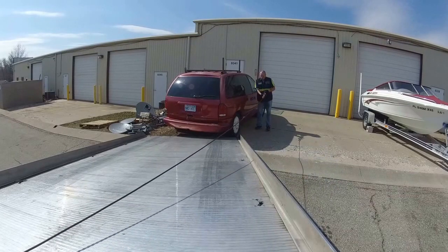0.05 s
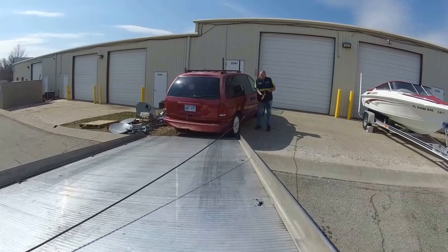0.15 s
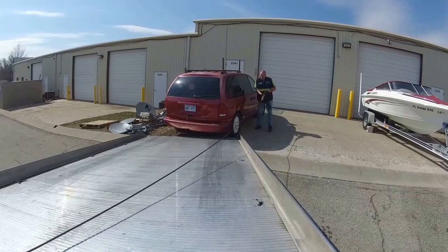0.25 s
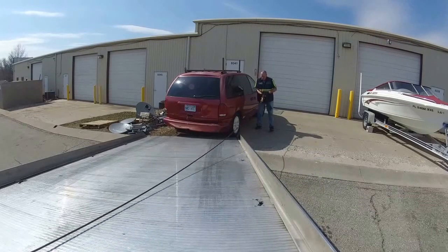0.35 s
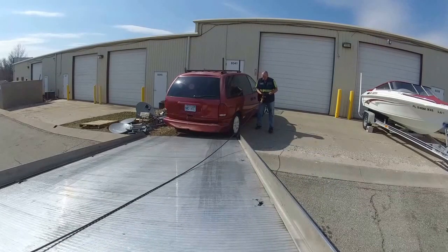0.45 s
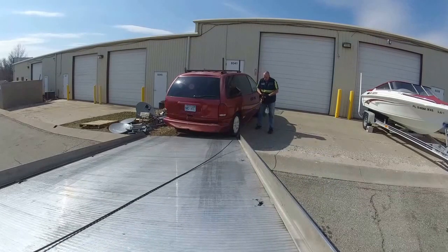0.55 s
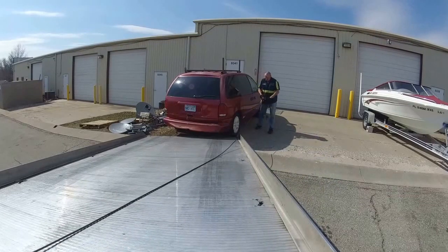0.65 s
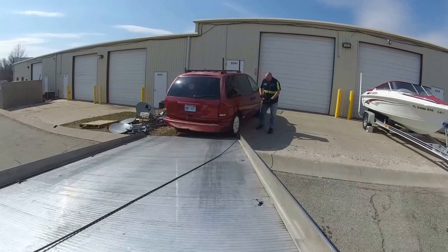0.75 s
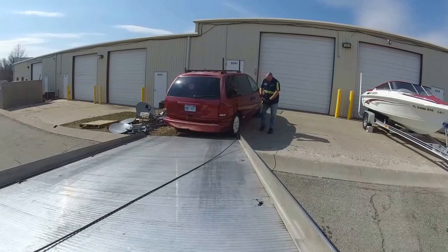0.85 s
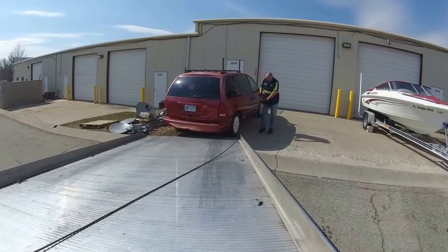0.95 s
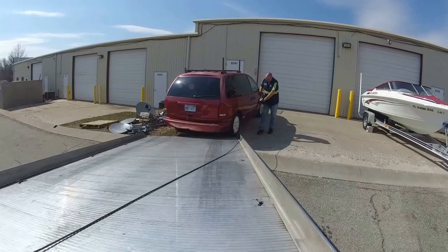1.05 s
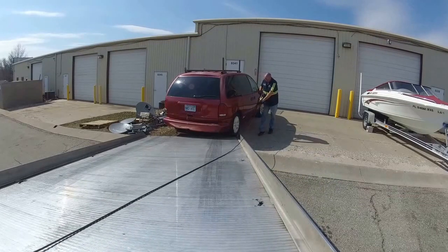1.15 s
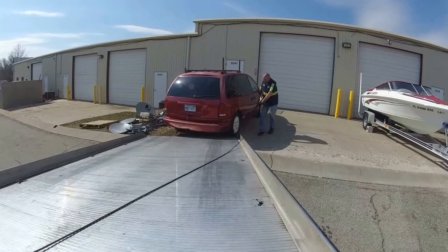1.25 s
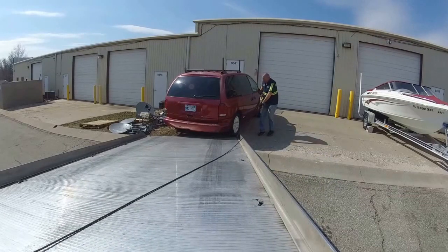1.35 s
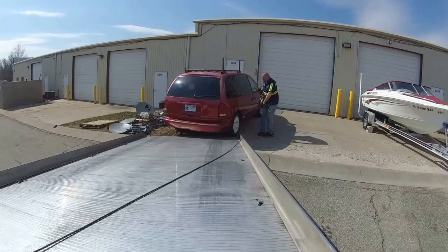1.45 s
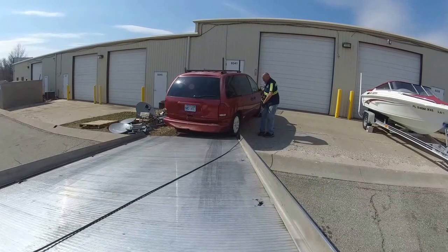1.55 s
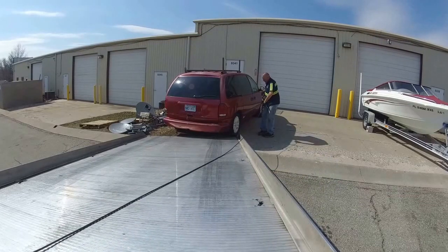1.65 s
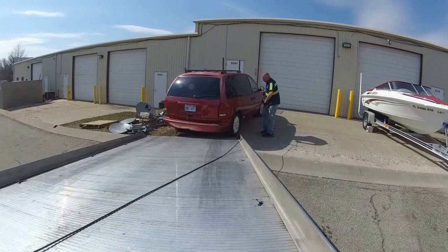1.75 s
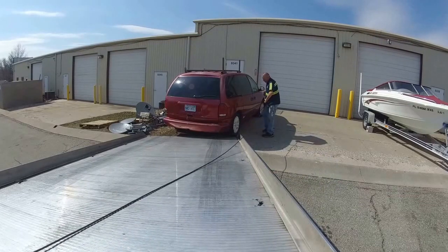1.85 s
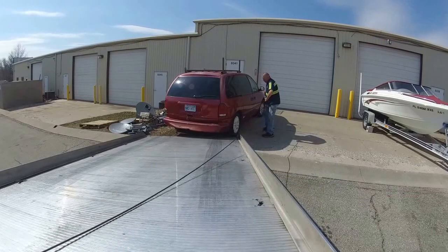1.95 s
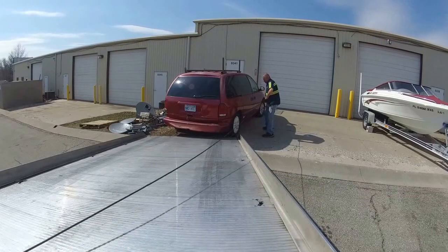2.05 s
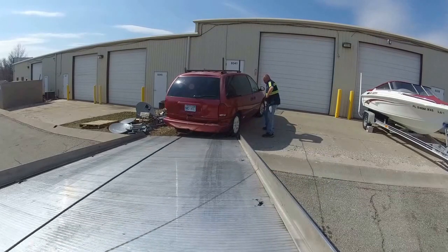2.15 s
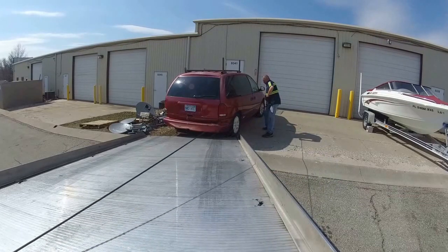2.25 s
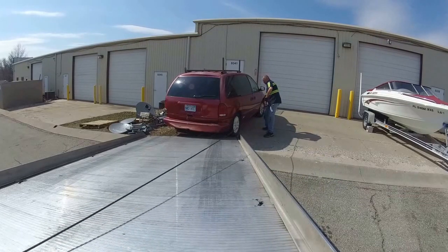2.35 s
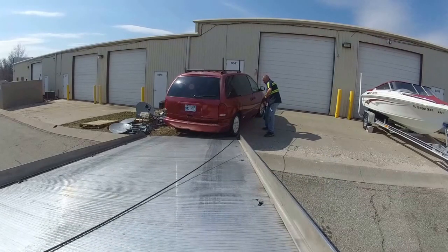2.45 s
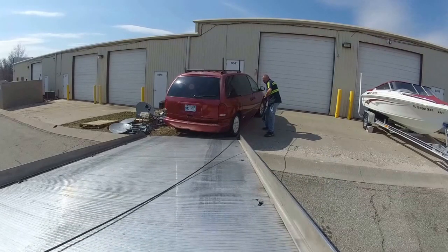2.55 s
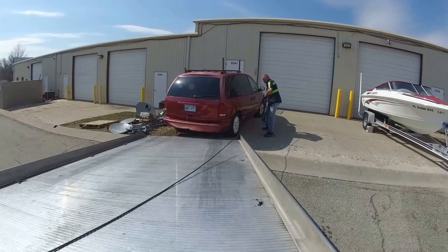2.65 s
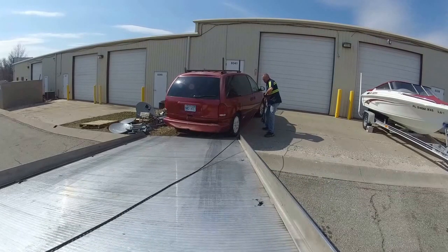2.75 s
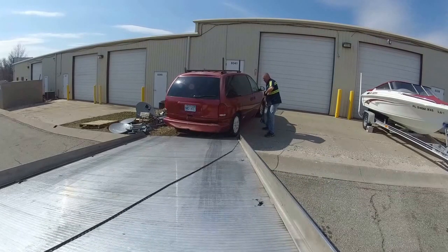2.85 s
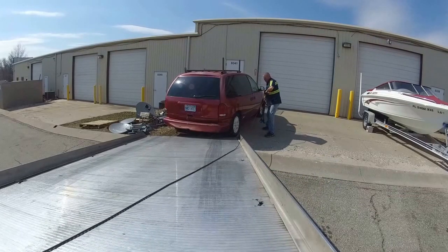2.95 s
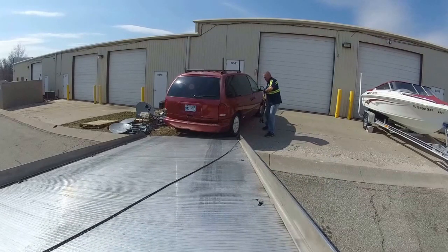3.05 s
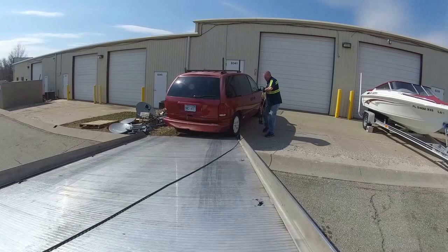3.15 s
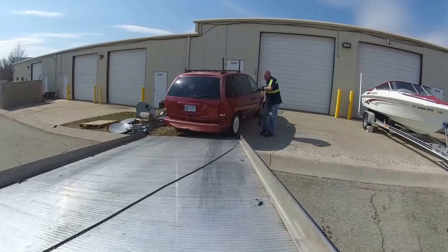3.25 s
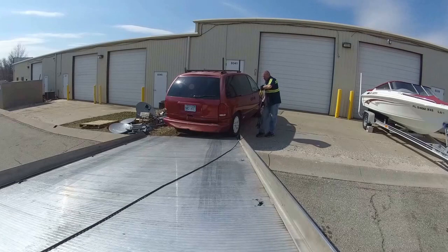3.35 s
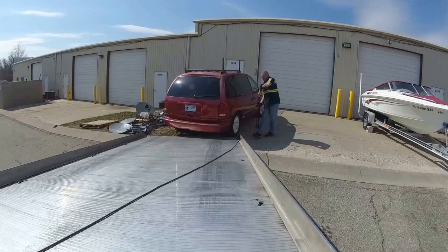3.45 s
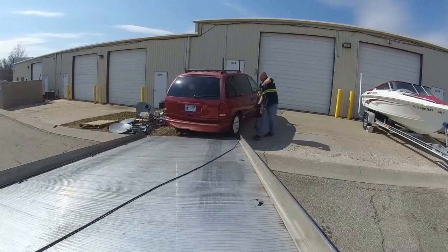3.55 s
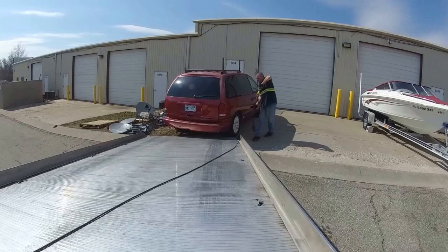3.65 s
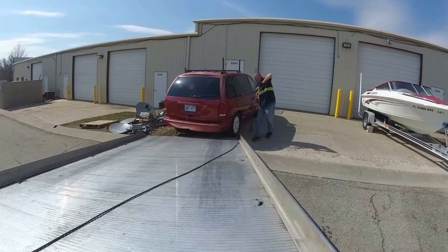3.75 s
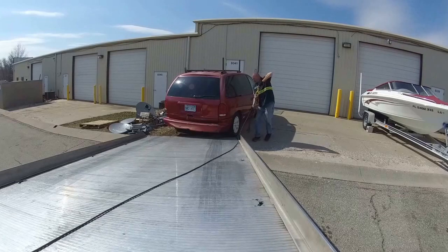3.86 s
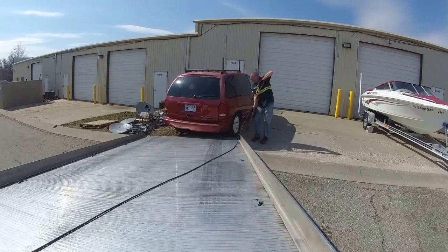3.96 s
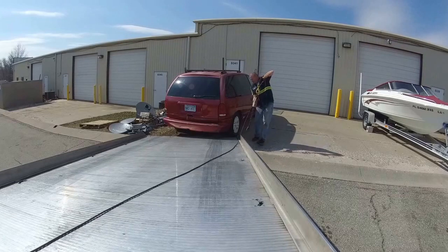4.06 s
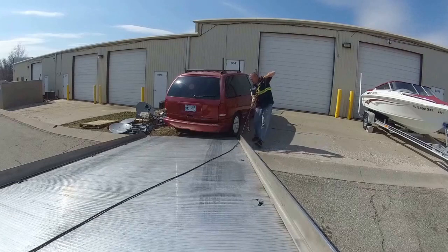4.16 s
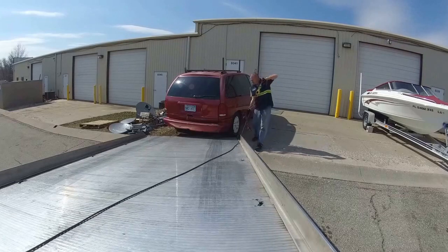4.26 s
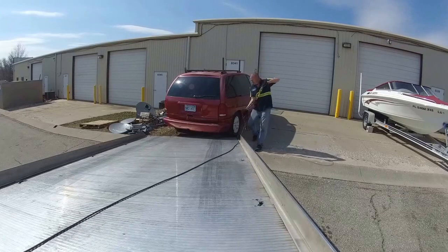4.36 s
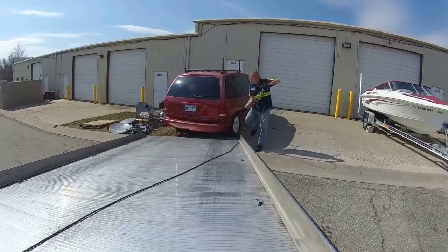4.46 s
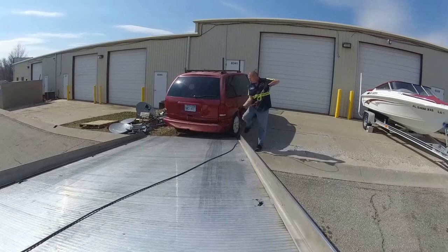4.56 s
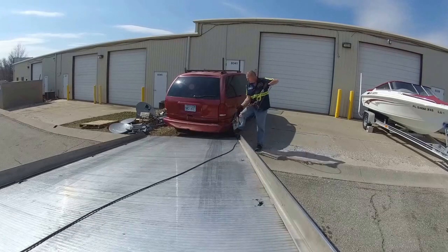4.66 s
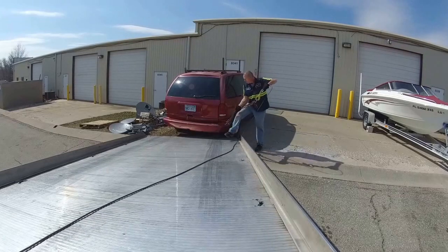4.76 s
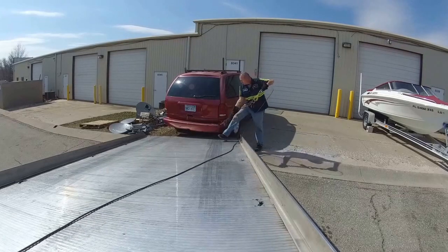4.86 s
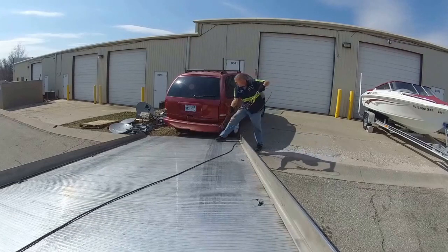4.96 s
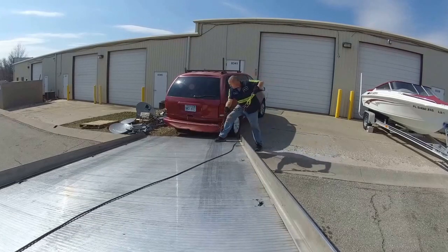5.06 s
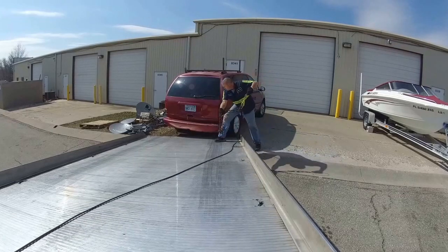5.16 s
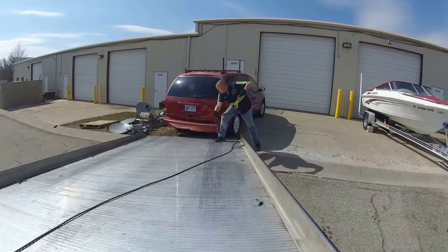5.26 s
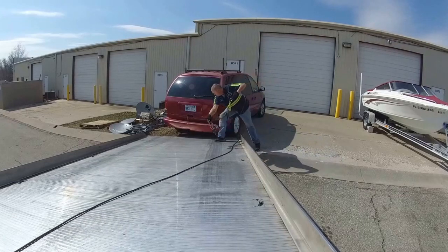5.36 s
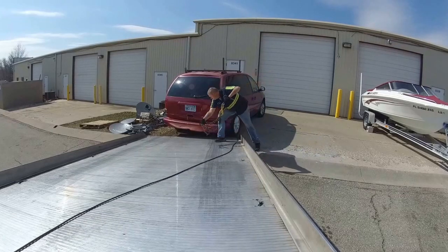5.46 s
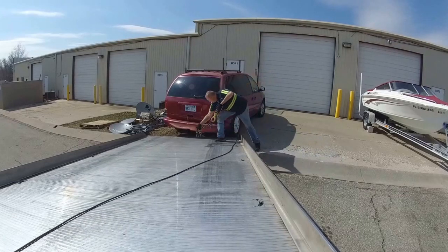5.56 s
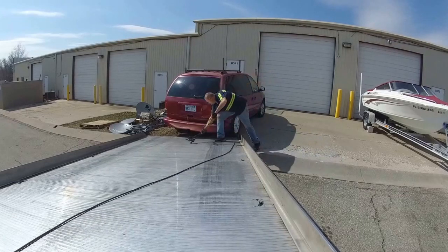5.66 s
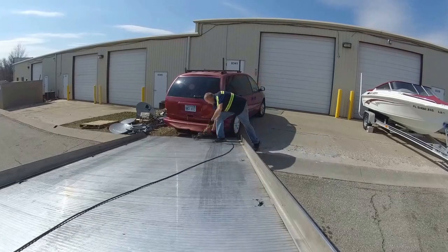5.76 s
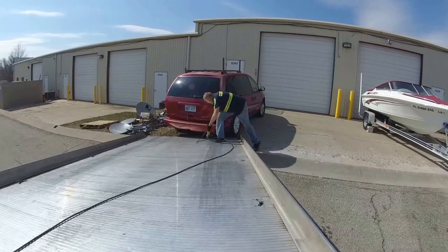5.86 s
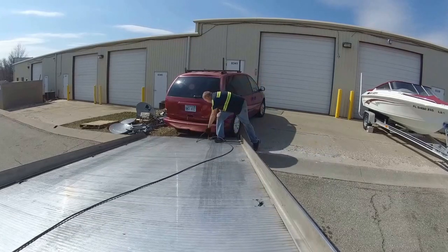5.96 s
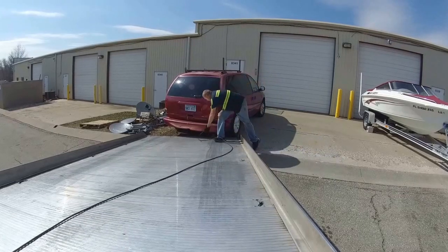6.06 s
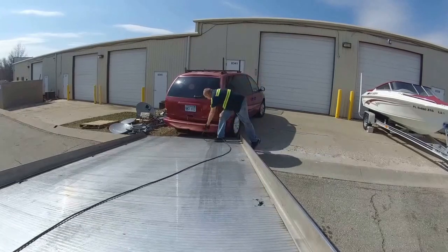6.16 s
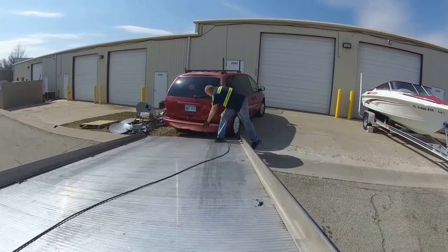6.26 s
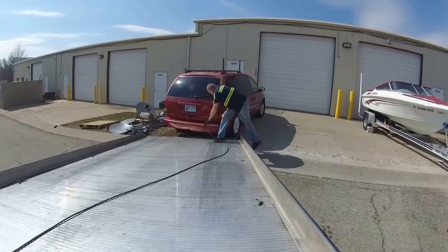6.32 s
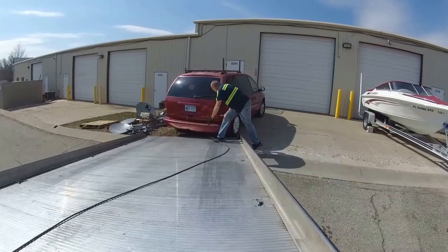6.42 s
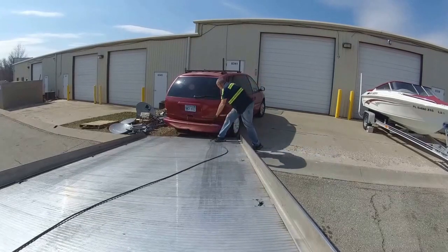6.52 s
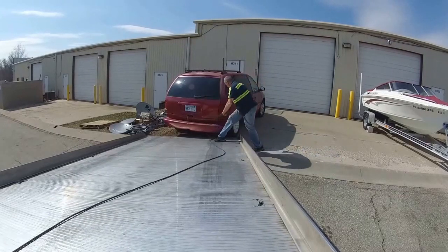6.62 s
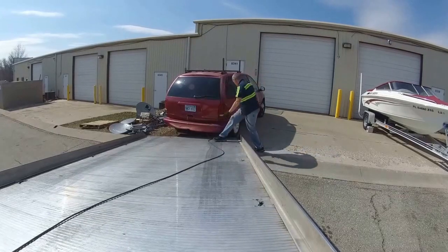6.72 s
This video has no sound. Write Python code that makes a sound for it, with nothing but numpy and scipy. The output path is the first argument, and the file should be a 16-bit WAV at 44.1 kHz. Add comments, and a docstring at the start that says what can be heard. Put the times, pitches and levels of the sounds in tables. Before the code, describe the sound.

Outdoors, a tow truck idles with a faint steady pump hum, thin machine tones and hiss. A worker handles a winch hook and chain: sparse bright, short clinks and tiny grazes. The cable knocks and rattles dully on the aluminium bed midway, then a few more clinks. Near the end the chain drops with a loud clatter and jangle, dying into small taps. Single fixed microphone; the background swells after loud sounds.

```python
"""From the start a tow truck idles: a soft pump hum, machine tones and hiss, made of sines and noise.
Links of a steel winch cable with hook and chain clink in the hand (dying sines) and graze (noise puffs).
The cable knocks, rattles and drags on the aluminium bed (noise bands, ringing tones); a shackle taps too.
Near 5.7 s the chain drops and jangles: many close tones struck at random, with single links ringing out.
All along, the camera's expander lifts the background after each loud sound, then sinks back slowly."""
import sys
import numpy as np
from scipy import signal
from scipy.fft import rfft, irfft
from scipy.io import wavfile
from scipy.ndimage import uniform_filter1d

SR = 44100
rng = np.random.default_rng(int(sys.argv[2]) if len(sys.argv) > 2 else 0)


def generate_wav(signal):
    """Clip the signal to [-1, 1] and save it as 16-bit WAV at the path in sys.argv[1]."""
    frames = np.transpose(np.atleast_2d(signal))
    scaled = np.clip(frames, -1, 1) * 32767
    pcm = np.round(scaled).astype(np.int16)
    wavfile.write(sys.argv[1], SR, pcm)


N = 299439  # length of the scene in samples


def amp(db):
    """Turn decibels into an amplitude factor."""
    return 10 ** (np.asarray(db) / 20)


def evened(x):
    """Scale a signal to rms 1."""
    return x / np.sqrt(np.mean(x ** 2) + 1e-20)


def read(points, hz):
    """Read a curve of (frequency, value) points, with straight lines on a log frequency scale."""
    f, value = np.transpose(points)
    return np.interp(np.log(hz + 1), np.log(f + 1), value)


def add(mix, s, sound):
    """Add a sound to the mix from time s on, cut off at the end."""
    part = mix[..., round(s * SR):][..., :sound.shape[-1]]
    part += sound[..., :part.shape[-1]]


def along(rows):
    """Columns of a curve at every sample, and a mask of its span."""
    s, *columns = np.transpose(rows)
    t = np.arange(N) / SR
    return [np.interp(t, s, c) for c in columns], (t > s[0]) & (t < s[-1])


def drift(rate_hz):
    """Chance wavering of rms 1: slow sines up to rate_hz, the slower ones stronger."""
    f = np.geomspace(.1, 1, 16) * rate_hz
    phase = rng.random(16)
    t = np.arange(0, N + 512, 512) / SR
    slow = np.sin(2 * np.pi * (f * t[:, None] + phase)) @ f ** -.5
    return np.interp(np.arange(N) / SR, t, evened(slow))


def sparse(per_s, spread_db, size=N):
    """Random contacts of uneven size, as single-sample clicks."""
    sizes = amp(spread_db * np.minimum(rng.exponential(1, size), 4))
    return sizes * (rng.random(size) < per_s / SR)


def ring(x, hz, t60):
    """One dying tone set off by x; t60 is the time in s to fall 60 dB. A unit click peaks near 1."""
    r, w = 10 ** (-3 / (t60 * SR)), 2 * np.pi * hz / SR
    return signal.lfilter([0, np.sin(w)], [1, -2 * r * np.cos(w), r * r], x)


def struck(modes, weight, damping, size):
    """Struck metal as a sum of dying sines, each with its own pitch, level and fall time."""
    hz, db, t60 = np.transpose(modes)[..., None]
    t = np.arange(size) / SR
    envelope = amp(db - 60 * t / (t60 * damping))
    return (weight[:, None] * envelope * np.sin(2 * np.pi * hz * t)).sum(0)


def nearness(modes, hz, reach):
    """Level in dB of each tone when a contact favours hz: the nearest gets 0, others lose reach per octave."""
    apart = abs(np.log2(np.transpose(modes)[0] / hz))
    return -reach * (apart - apart.min())


def truck():
    """A steady pump with overtones, wavering machine tones, engine drone, and hiss of air and electronics."""
    pump_hz = 259.3
    # pump overtones: multiple of the pump tone, rms level/dB
    overtones = [(1, -73), (2, -78), (3, -76.5), (4, -79.5), (5, -82), (10, -82)]
    # idling machinery: f/Hz, rms level/dB
    machine_tones = [(190, -92), (404, -88), (856, -97.5), (1211, -77.5), (1265, -75.5), (1375, -88),
                     (1712, -79.5), (1825, -84), (1897, -87.5), (2347, -101), (2550, -81.5), (2606, -81.5),
                     (2676, -83.5), (3140, -84), (3316, -89)]
    # colour of the hiss: f/Hz, relative level/dB
    hiss_colour = [(15, -55), (30, -48), (70, -48), (105, -39), (140, -54), (185, -12), (230, -20),
                   (450, -13.5), (780, -4), (1240, -1), (1540, -5), (2560, -6), (5300, -15), (15700, -22)]
    hiss_db = -64.5
    t = np.arange(N) / SR
    turns = pump_hz * t + np.cumsum(0.22 * drift(2.017)) / SR  # pitch strays by 0.22 Hz rms
    hum = np.zeros(N)
    for k, db in overtones:
        level = amp(db + .5 * np.sqrt(k) * drift(26.0))
        hum += level * np.sin(2 * np.pi * (k * turns + rng.random()))
    for hz, db in machine_tones:
        level = amp(db + 3.0 * drift(9.7))
        cycles = hz * t + np.cumsum(.0012 * hz * drift(5.3)) / SR
        hum += level * np.sin(2 * np.pi * (cycles + rng.random()))
    drone = ring(ring(rng.standard_normal(N), 110., 0.074), 110., 0.074)
    hum += amp(-103) * evened(drone)  # fuzzy engine drone

    # the hiss is built in short frames; below 4 kHz it is patchy
    frames, hz = N // 256 + 5, np.fft.rfftfreq(1024, 1 / SR)
    a, b, patches = rng.standard_normal((frames, 513, 3)).T
    patches = uniform_filter1d(patches, 14, 0)
    patches = evened(uniform_filter1d(patches, 16, 1))
    level_db = read(hiss_colour, hz)[:, None] + 0.98 * patches * (hz[:, None] < 4000)
    hiss = signal.istft((a + 1j * b) * amp(level_db), nperseg=1024, noverlap=768)[1][:N]
    return np.sqrt(2) * hum + amp(hiss_db) * evened(hiss)  # root 2 turns rms into sine peaks


def ticks():
    """Links graze without a ring: short puffs of noise around a high, heavily damped tone."""
    # grazing contacts: t/s, level/dB, centre f/Hz
    grazes = [(0.3855, -56, 7750), (0.8345, -67, 8090), (0.9114, -65, 7930), (0.973, -87, 8000),
              (1.4676, -68, 8390), (1.496, -61, 8100), (1.7534, -58, 7450), (1.791, -60, 7600),
              (2.7212, -65.5, 9600), (3.3732, -63.5, 7550), (3.6885, -66, 7330), (4.2193, -67, 8500),
              (4.2344, -65, 7860), (4.24, -62, 5950), (4.4196, -60.5, 7800), (4.4722, -64, 8000),
              (4.5002, -66, 7390), (4.983, -51, 7580), (5.5583, -70, 8650), (5.585, -63, 7450)]
    width_hz, decay_s, rise_s = 840, 0.0072, 0.0014
    out, luck = np.zeros(N), rng.standard_normal((len(grazes), 2000))
    t = np.arange(2000) / SR
    for (s, db, hz), noise in zip(grazes, luck):
        puff = evened(ring(ring(noise, hz, 2.0 / width_hz), hz, 2.0 / width_hz))
        add(out, s, amp(db) * puff * np.exp(-t / decay_s) * np.minimum(t / rise_s, 1))
    return out


def shackle():
    """The hook's shackle knocks on the bed; each knock rings all its tones, a little unevenly."""
    # knocks: t/s, level/dB
    hits = [(2.0873, -62), (2.1542, -65), (2.207, -67), (2.2808, -66), (2.295, -64), (2.3155, -58)]
    # shackle tones: f/Hz, level/dB, t60/s before damping
    shackle_tones = [(1610, 4, 0.18), (3270, 2.5, 0.21), (3500, -25, 0.22), (4150, -10, 0.32),
                     (4430, -16, .1), (5220, -2, 0.16), (7250, -12, 0.13), (9300, -10, 0.11),
                     (11600, -6, 0.083)]
    out, luck = np.zeros(N), rng.standard_normal((len(hits), len(shackle_tones)))
    for (s, db), row in zip(hits, luck):
        add(out, s, amp(db) * struck(shackle_tones, amp(4.1 * row), 0.86, size=9000))
    return out


def clinks(touches, modes, dampings, others_db, tick_db, rise_s, size):
    """A touch rings its two favoured tones; the others flash briefly with a bright tick."""
    out, luck = np.zeros(N), rng.standard_normal((len(touches), len(modes) + 800))
    band = signal.butter(2, [4500., 9200.], "bandpass", fs=SR, output="sos")
    rise = np.minimum(np.arange(size) / SR / rise_s, 1)
    for touch, damping, row in zip(touches, dampings * np.ones(len(touches)), luck):
        s, db, low_hz, high_hz, high_db = touch
        low_near = nearness(modes, low_hz, 1170.0)
        high_near = high_db + nearness(modes, high_hz, 450.0)
        near = np.maximum(low_near, high_near)
        sound = struck(modes, amp(near), damping, size)
        # the other link's close tone, 1.2 % higher, dies twice as fast
        sound += struck(np.multiply(modes, [1.012, 1, .5]), amp(near - 11), damping, size)
        flash_db = others_db + max(high_db, 0) + 0.58 * row[800:]
        sound += struck(modes, amp(flash_db), .4 * damping, size)
        tick = signal.sosfilt(band, row[:800]) * np.exp(-np.arange(800) / 360.0)
        sound[:800] += amp(tick_db + high_db) * tick
        add(out, s, amp(db) * sound * rise)
    return out


def held_links():
    """Links clink in the hand; the grip shortens every ring."""
    # touches: t/s, level/dB, lower tone f/Hz, upper tone f/Hz, upper tone level/dB
    touches = [(0.2603, -55, 5540, 8050, -16), (0.2982, -47, 5460, 7650, -20),
               (0.3144, -59.5, 5730, 8270, 7), (0.5721, -60.5, 5530, 7500, -2),
               (0.634, -48.5, 6110, 7560, -28), (0.7794, -67, 5570, 7450, -20),
               (0.8599, -52, 6070, 7640, -27), (0.9085, -56, 5510, 7850, -10),
               (0.9294, -60.5, 6480, 7440, -43), (0.9467, -50.5, 6100, 7900, -19),
               (1.1628, -59.5, 5930, 8440, 2.5), (1.7513, -46.5, 5510, 8380, -2.5),
               (1.7626, -51.5, 5300, 7440, -3), (1.779, -47.5, 5600, 7330, -15),
               (1.8094, -56, 5700, 8410, -3), (1.8344, -56.5, 5470, 7600, -6),
               (2.0138, -50, 5500, 8480, -31), (2.0854, -49, 4240, 7260, -11),
               (2.8429, -64, 5560, 7560, -17), (2.9058, -48.5, 4500, 7340, -10),
               (3.4371, -52, 5420, 7280, -11), (3.4506, -47, 5390, 7280, -21),
               (3.491, -62.5, 5390, 7200, -5), (4.222, -58, 5500, 8430, -10), (4.376, -52, 5300, 7300, -23),
               (4.4179, -56, 4500, 5470, 4.5), (4.6194, -62, 5000, 8000, -17),
               (4.98, -38.5, 6080, 8000, -30), (5.058, -64, 6180, 7650, -13)]
    # hand-held hook and links: f/Hz, level/dB, t60/s before the grip's damping
    hook_tones = [(4450, -3.5, 0.17), (4700, 2, 0.16), (5260, -27, .12), (5380, -1, 0.1), (5510, -7, 0.11),
                  (5970, -1, 0.082), (6130, -5, 0.12), (6220, -10.5, 0.15), (7590, -2, 0.21),
                  (7950, -25, 0.21), (8400, -9, 0.04), (8100, -8, 0.076), (8600, 3.5, 0.11),
                  (8850, -22, 0.061), (9900, -23, 0.17), (11200, -3, 0.075)]
    grip_damping = 0.69  # factor on t60
    return clinks(touches, hook_tones, grip_damping, -18.5, -1.2, 0.0025, size=6000)


def bed():
    """The plate's crowded modes act as noise in bands; each blow wakes them, and treble mostly dies first."""
    # blows: t/s, level/dB, bass/dB, treble/dB, top/dB, t60/s before the band factors,
    # tone of the struck spot f/Hz, level of that tone/dB
    knocks = [(0.402, -41, -15, -2.5, -16, 0.12, 1140, -6), (0.407, -48, 0, 5, -12, 0.18, 1800, -0.5),
              (0.446, -64, -10, -17, -4, 0.22, 1120, 0), (1.144, -65.5, 1, -4, 3, 0.18, 1110, 2.5),
              (2.085, -58, 11.5, 15.5, 22, 0.14, 1600, -7), (2.154, -64.5, 16, 3, 8, 0.44, 1660, 0),
              (2.199, -69, 6, 14.5, 2, 0.1, 3170, 1), (2.295, -58.5, 4, -3, 23.5, 0.15, 1530, 6),
              (2.314, -57.5, -1, 11, 19, 0.1, 1690, 10), (2.325, -53.5, 4, -14, 22, 0.26, 1760, 0),
              (2.407, -49.5, -2, 0.5, 9, 0.21, 1758, -2), (2.483, -38, -4.5, 4, -28, 0.17, 1560, 3),
              (2.489, -48.5, -15, 4, -19, 0.1, 1105, 9), (2.508, -57.5, -3, -17, -11, 0.27, 1120, 7),
              (2.637, -48, -4, 2.5, -7, 0.17, 1900, -6), (2.811, -54, -12, -1, 1, 0.12, 1330, -2),
              (2.842, -50, -5, 1.5, -7, 0.21, 1760, -2.5), (2.855, -53, -7, 3, -5, 0.16, 1420, -6),
              (2.868, -60, -4, -5, -4, 0.31, 826, 7.5), (2.912, -51.5, 3, 6, 7, 0.26, 1060, -6),
              (3.461, -65, -5, -5, 31, 0.26, 1260, 6), (3.581, -73, 17, 3, 7, 0.28, 1250, 10),
              (3.776, -59, -10, -1, 10, 0.13, 1280, 11), (4.162, -59, -13, -3, 1, 0.16, 1030, -7),
              (4.589, -58, 4.5, 0, 8, 0.2, 1082, -2), (5.043, -73, 13, -3, 9, 0.31, 1010, 3),
              (5.676, -36, -15, 6.5, 10, 0.14, 1450, 1), (5.698, -28.5, 4, 1.5, 11, 0.21, 1262, 10),
              (5.726, -41, 13, 8.5, 24, 0.21, 973, 8), (5.746, -40, -6, 6.5, 16, 0.2, 830, 4),
              (5.825, -46, 11, -19, 16, 0.19, 818, 3.5), (5.86, -30, -3, -3.5, 18, 0.49, 1170, -2),
              (5.92, -31, -1.5, 6, 21, 0.47, 1160, -1.5), (5.944, -30, 0, -10, 9, 0.13, 960, 2.5),
              (5.962, -24.5, -16, -2, 17, 0.064, 1420, -9), (5.998, -34, -19, -20, 4, 0.46, 830, -1.5),
              (6.029, -41, -17, 6.5, 13, 0.63, 930, -10), (6.117, -46, 6, 7.5, 19, 0.27, 840, 3.5),
              (6.23, -49.5, -9, 13, 2, 0.15, 1420, 12.5), (6.243, -49.5, 4.5, 10, 29, 0.21, 1430, -8),
              (6.371, -48, -20, 5, -2, 0.13, 1300, 9.5), (6.437, -51, -13, 0, -2, 0.11, 1477, 10),
              (6.584, -51, -4, -5, -3, 0.35, 1720, -4), (6.647, -62, -11, -3, -1, 0.15, 1220, 12.5)]
    # colour of the crowded modes: f/Hz, relative level/dB
    bed_colour = [(24, -81), (40, -102), (158, -22.5), (351, -21), (461, -21), (638, -10.5), (905, -8.5),
                  (1220, -1.5), (2110, -8), (2850, -6.5), (5590, -17), (9000, -29), (12500, -39.5),
                  (15600, -53)]
    # bands: centre f/Hz, factor on t60
    bed_bands = [(300, 2.2), (900, 1.5), (1800, 0.85), (3200, 0.63), (6000, 0.48), (11000, 0.18)]
    # clear tones of the plate: f/Hz, level/dB, t60/s
    plate_tones = [(817, 1, 0.16), (975, -3.5, 0.22), (1001.5, 13, 0.08), (1114, -1.5, 0.37),
                   (1315, -6, 0.05), (1430, -5, 0.19), (1500, 5.5, 0.039), (1648, 1, 0.16),
                   (1758, 7, 0.066), (1987, 6.5, 0.1), (2260, -34, 0.064), (2520, -19, 0.074),
                   (2800, -11, .08), (3100, 21, 0.083), (3210, 7, .1), (3430, 3, .08)]
    # cable and chain dragging on the bed, a list of two pulls: t/s, level/dB
    pulls = [
        [(2.08, -68), (2.3, -65), (2.47, -63.5), (2.7, -65), (2.86, -58.5), (3.03, -73), (3.6, -68)],
        [(5.67, -45), (5.9, -54), (6.2, -74), (6.44, -51.5), (6.52, -64.5), (6.79, -65)],
    ]
    drag_treble_db = -4.5
    rise_share = 0.018  # a blow that dies slowly also rises slowly: attack as a share of t60
    chatter_db, chatter_t60_s = -11, 0.29  # the cable keeps chattering after each blow
    chatter_colour = 0.53  # share of the blow's colour that its chatter keeps

    hz, centre, quick = np.fft.rfftfreq(N, 1 / SR), *np.transpose(bed_bands)
    crowd = rfft(rng.standard_normal(N)) * amp(read(bed_colour, hz))
    crowd /= np.sqrt(np.mean(irfft(crowd, N) ** 2))
    shares = [np.sqrt(read(np.c_[centre, row], hz)) for row in np.eye(len(centre))]
    bright = np.clip(np.log2(centre / 1820.0), 0, 1.3)[:, None]  # how far a band counts as treble

    # power over time of each noise band, each clear tone, and the chatter
    power, drive = np.zeros((len(centre), N)), np.zeros((len(plate_tones), N))
    chatter = np.zeros((len(centre), N))
    t = np.arange(16000) / SR
    for s, db, bass_db, treble_db, top_db, t60, spot_hz, spot_db in knocks:
        rise = 1 - np.exp(-t / (rise_share * t60))
        colour_db = np.r_[[[bass_db]], treble_db * bright[1:-1], [[top_db]]]
        blow_db = db + colour_db - 60 * t / (t60 * quick[:, None])
        add(power, s, (rise * amp(blow_db)) ** 2)
        spot_near = nearness(plate_tones, spot_hz, 101.0)[:, None]
        tone_db = db + spot_db + spot_near - 60 * t / (0.77 * t60)
        add(drive, s, (rise * amp(tone_db)) ** 2)
        after_db = db + chatter_db + chatter_colour * colour_db - 60 * t / chatter_t60_s
        add(chatter, s, (rise * amp(after_db)) ** 2)
    for rows in pulls:
        (db,), on = along(rows)
        chatter += on * amp(db + drag_treble_db * bright) ** 2

    # chatter and drag are made of random taps, each dying away in every band
    taps = evened(sparse(250., 1.6)) ** 2
    keep = 10 ** (-6 / (0.14 * quick * SR))
    stir = np.array([signal.lfilter([1 - k], [1, -k], taps) for k in keep])
    power += stir * chatter

    # noise keeps feeding the clear tones during each blow, so they come out fuzzy
    shake, tones = rng.standard_normal(N), np.zeros(N)
    for (f, db, t60), p in zip(plate_tones, drive):
        tones += amp(db - 26.0) * ring(shake * np.sqrt(p), f, t60)
    tones = signal.sosfilt(signal.butter(4, 600., "highpass", fs=SR, output="sos"), tones)
    return tones + sum(irfft(crowd * h, N) * np.sqrt(p) for h, p in zip(shares, power))


def lying_links():
    """Single links of the chain on the bed ring out, longer or shorter as each is damped."""
    # rings: t/s, level/dB, lower tone f/Hz, upper tone f/Hz, upper tone level/dB, factor on t60
    chimes = np.array([(5.937, -23.5, 3380, 8130, -18, 0.17), (5.96, -37.5, 6184, 8170, -6, 0.4),
                       (5.988, -40.5, 5500, 7235, -10, 0.3), (6.022, -39.5, 6110, 5265, -10, 0.57),
                       (6.03, -50.5, 4877, 4440, -2.5, 0.7), (6.09, -55, 4440, 10700, -15, 0.87),
                       (6.155, -47, 4877, 10560, -1, 0.63), (6.155, -57, 11990, 12890, 8, 0.9),
                       (6.172, -48.5, 6110, 7460, -5, 0.64), (6.2, -44.5, 5265, 14290, -19, 0.48),
                       (6.229, -54, 4500, 11250, 0, 0.5), (6.32, -56, 8300, 7300, -7, 0.5),
                       (6.372, -46, 5500, 4390, -1, 0.12), (6.456, -59.5, 5350, 7670, 1, 0.48)])
    # chain lying on the bed: f/Hz, level/dB, t60/s before damping
    chain_tones = [(3380, 4.5, 0.2), (4550, 8, 0.3), (4877, 0, 0.36), (5320, -0.5, 0.53), (5470, 4, 0.22),
                   (6130, -2, 0.46), (6250, -1, 0.7), (7250, 6, 0.49), (7740, 4, 0.73), (7900, 8, 0.38),
                   (8134, -20, 0.39), (9200, -13, 0.78), (9330, -13, 0.72), (10420, -11, 0.68),
                   (10700, -6.5, 0.98), (11100, -9, 0.79), (11800, -10, 0.4), (12890, -7, .35),
                   (14290, -9, .55)]
    return clinks(chimes[:, :-1], chain_tones, chimes[:, -1], -12.0, -7.0, 0.0041, size=20000)


def jangle():
    """Links tumble: many close tones, each struck by its own random contacts."""
    # loudness of the tumble: t/s, low tones level/dB, middle tones level/dB, high tones level/dB
    tumble = [(5.822, -70, -66, -66), (5.84, -54, -53, -61), (5.858, -60, -58, -65),
              (5.88, -49, -37.5, -56), (5.915, -46.5, -42, -51), (5.94, -43, -40.5, -50),
              (6.0, -46, -37.5, -56), (6.05, -54, -47.5, -58), (6.14, -57, -54, -61),
              (6.168, -54, -43, -64), (6.2, -52.5, -49.5, -63), (6.36, -59.5, -56, -71),
              (6.5, -64.5, -66.5, -80), (6.6, -90, -85, -85)]
    # links of slightly different size, a low, a middle and a high group of tone clusters:
    # f/Hz, width/Hz (twice the standard deviation), level/dB within the group
    link_groups = [
        [(4710, 246, 2), (5380, 310, 3), (6000, 320, 1)],
        [(7560, 230, 2.5), (7740, 317, 1), (8410, 341, -1), (9170, 900, -5.5)],
        [(11700, 1000, -1.5), (12600, 890, -25), (14300, 400, -2), (15100, 700, -4)],
    ]
    levels_db, on = along(tumble)
    start, out = round(tumble[0][0] * SR), np.zeros(N)
    for group, group_db in zip(link_groups, levels_db):
        x = np.zeros(N)
        for hz, width, tone_db in group:
            for f in np.minimum(hz + .5 * width * rng.standard_normal(13), 16000):
                contacts = sparse(30., 1.8, size=N - start)
                x[start:] += amp(tone_db) * ring(contacts, f, 0.094)
        # even out the loudness so that the curve sets it
        out += amp(group_db) * x / np.sqrt(uniform_filter1d(x ** 2, 3000) + 1e-6)
    return uniform_filter1d(on * 1., 400) * out


def scene():
    """All layers together, as one channel."""
    background = truck()
    light_contacts = ticks() + shackle() + held_links()
    return (background + light_contacts + bed() + lying_links() + jangle())[None]


def record(dry):
    """An expander opens on loud sound and sinks back slowly; then the highest treble is cut off."""
    edge_hz = 15740
    keep = np.exp(-1 / (0.062 * SR))  # loudness is averaged over about 62 ms
    power = signal.lfilter([1 - keep], [1, -keep], dry[0] ** 2)
    power_db = 10 * np.log10(power + 1e-12)
    wish_db = np.clip(0.76 * (power_db + 52.5), -8., 0)
    fall = np.arange(N) * 6.7 / SR  # sinking speed, dB a second
    gain_db = np.maximum.accumulate(wish_db + fall) - fall
    opened = dry * amp(uniform_filter1d(gain_db, 200))
    lowpass = signal.firwin(1023, edge_hz, window=("kaiser", 10), fs=SR)
    return signal.oaconvolve(opened, lowpass[None], "same")


dry = scene()
out = record(dry)
generate_wav(out)
```